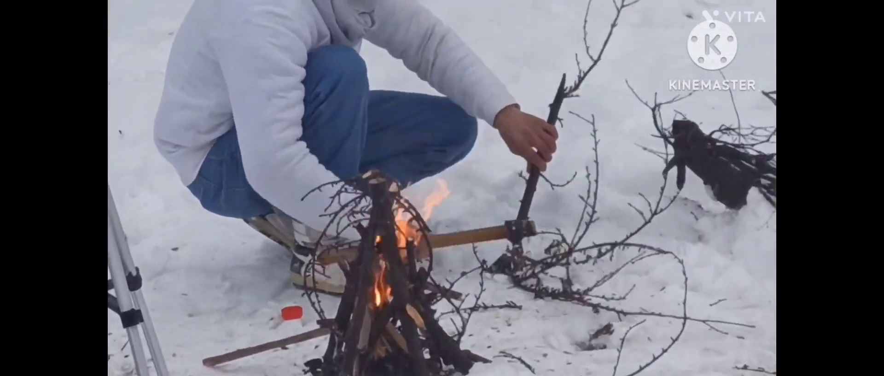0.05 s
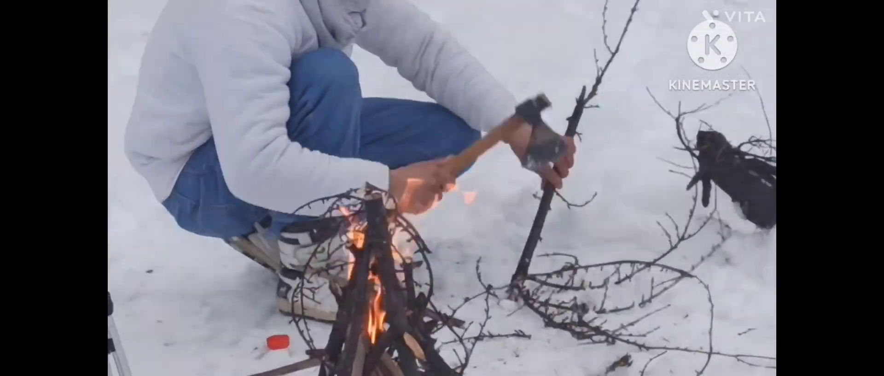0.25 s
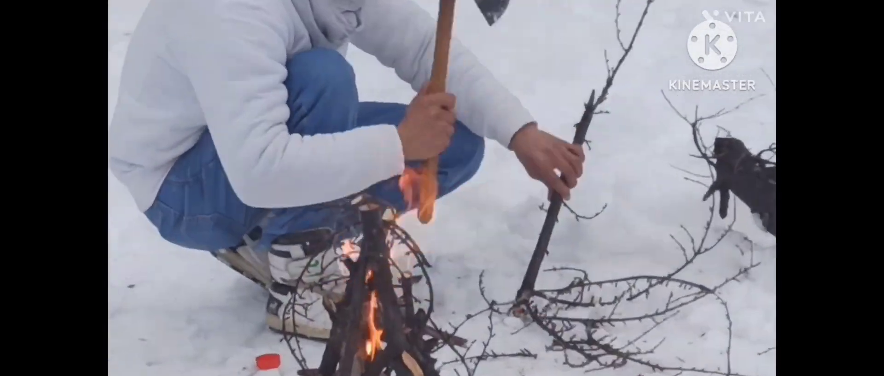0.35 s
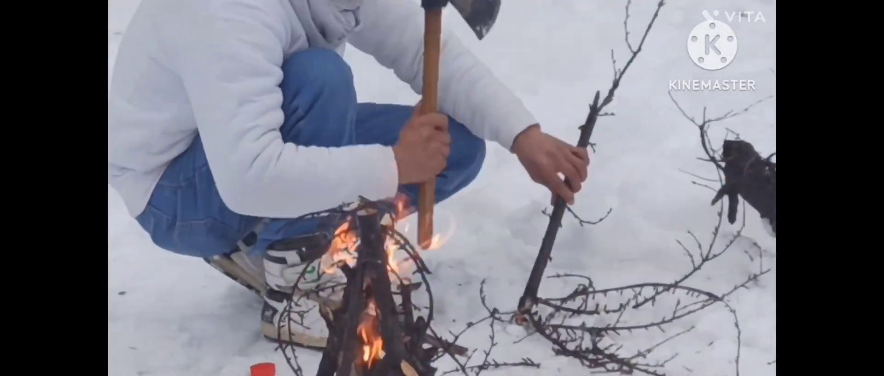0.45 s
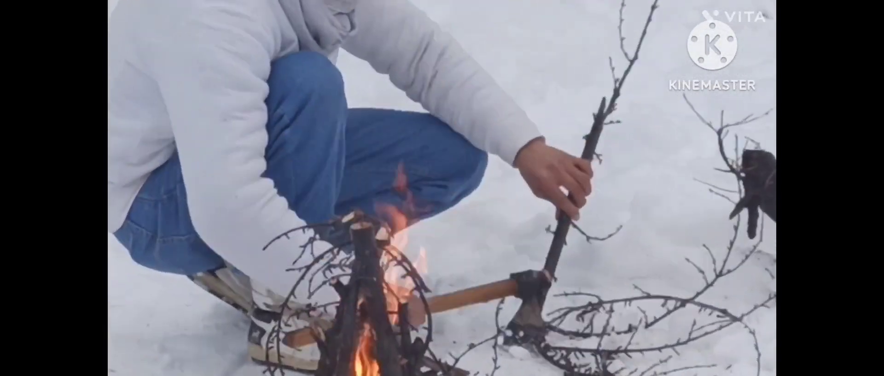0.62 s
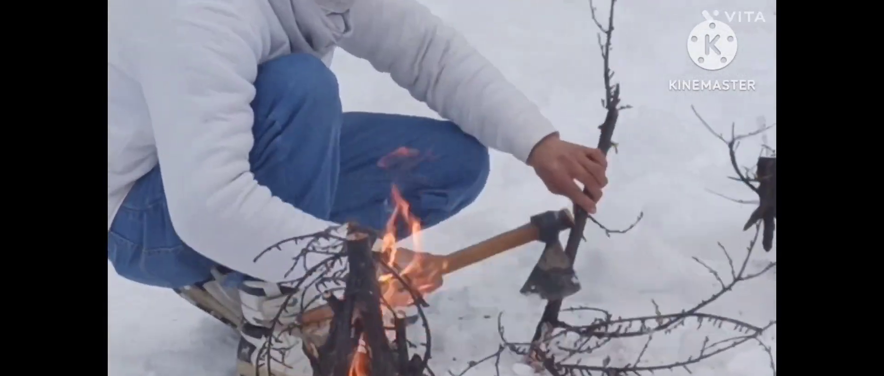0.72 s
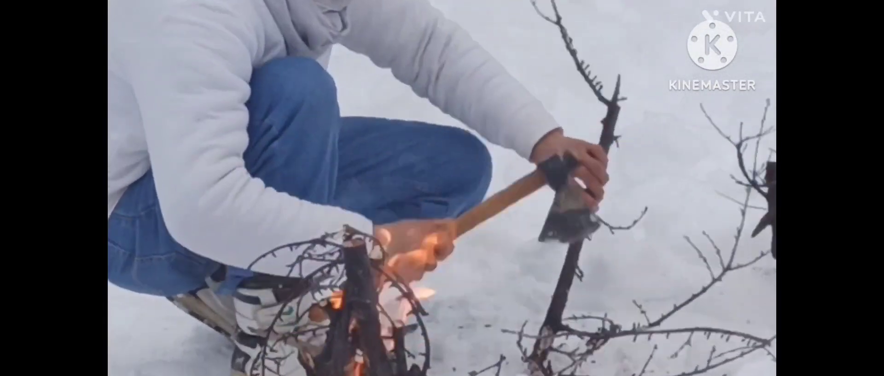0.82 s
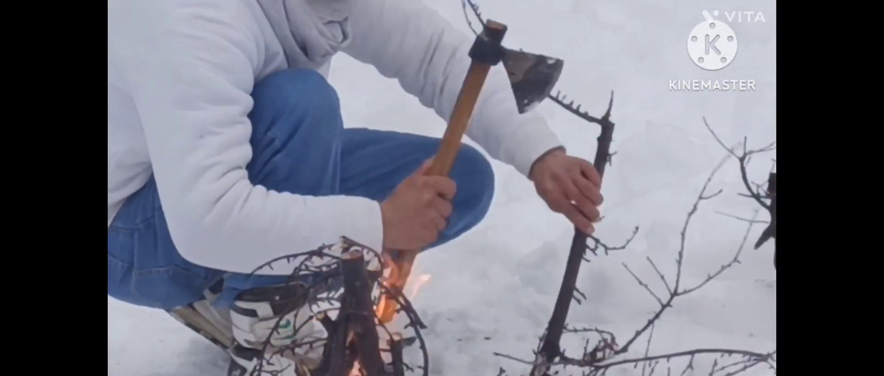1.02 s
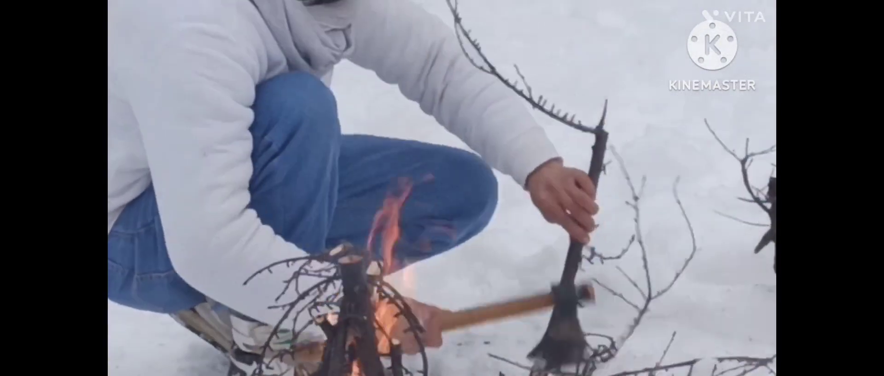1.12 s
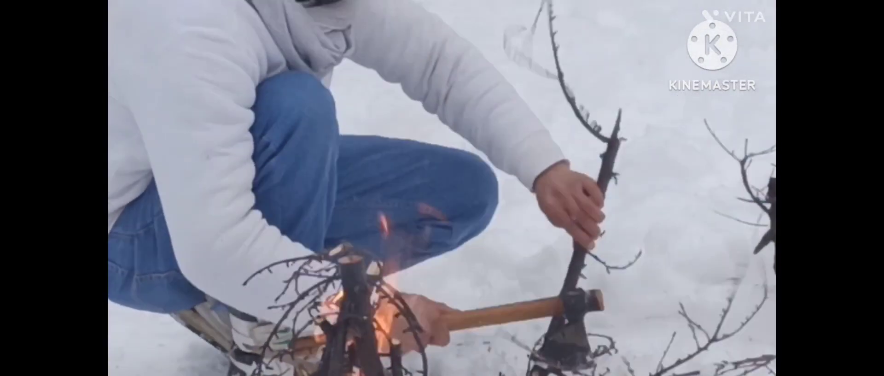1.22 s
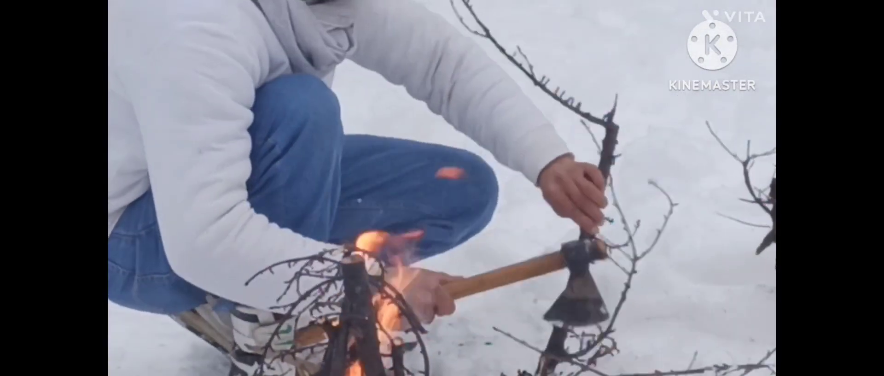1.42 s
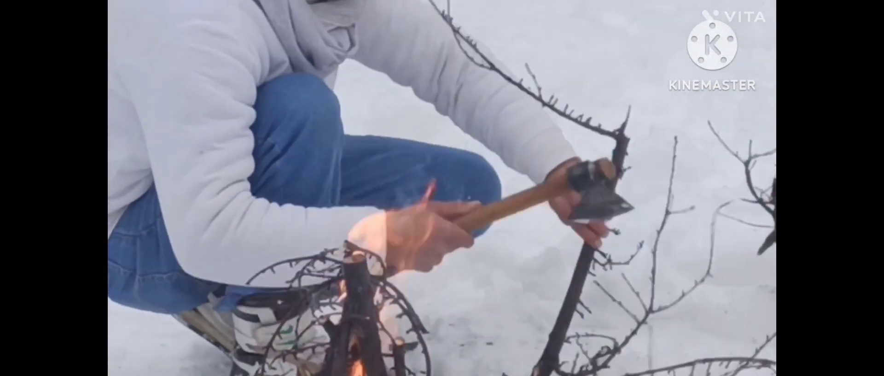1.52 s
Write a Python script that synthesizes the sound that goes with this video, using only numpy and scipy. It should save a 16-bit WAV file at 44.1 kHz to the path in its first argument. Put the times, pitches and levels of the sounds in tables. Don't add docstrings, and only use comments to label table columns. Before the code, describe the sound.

A small hatchet chops a thin branch three times beside a softly hissing outdoor fire

```python
import sys
import numpy as np
from scipy import signal
from scipy.fft import rfft, irfft, next_fast_len
from scipy.io import wavfile
from scipy.ndimage import uniform_filter1d, map_coordinates

SR = 44100
rng = np.random.default_rng(int(sys.argv[2]) if len(sys.argv) > 2 else 0)


def bounce(signal):
    frames = np.transpose(np.atleast_2d(signal))
    limited = np.clip(frames, -1, 1)
    pcm = np.round(limited * 32767).astype(np.int16)
    wavfile.write(sys.argv[1], SR, pcm)


def rack_gain(trim_db):
    fader = np.asarray(trim_db, float)
    return 10 ** (fader / 20)


N = 68355


def unit(x):
    return x / np.sqrt(np.mean(x ** 2) + 1e-20)


def along(points, hz):
    point_hz, value = np.transpose(points)
    return np.interp(np.log(hz + 1), np.log(point_hz + 1), value)


def wobble(rate_hz):
    knots = rng.standard_normal(int(N * rate_hz / SR) + 4)
    return map_coordinates(knots, [np.arange(N) * rate_hz / SR])


def filtered(x, response):
    size = 2 * next_fast_len(len(x) // 2 + 4096)
    spectrum = rfft(x, size) * response(np.fft.rfftfreq(size, 1 / SR))
    return irfft(spectrum, size)[:len(x)]


def add(out, start_s, x):
    part = out[round(start_s * SR):][:len(x)]
    part += x[:len(part)]


def ring(modes, attack_s, scatter_db):
    t = np.arange(SR // 5) / SR
    out = np.zeros(len(t))
    for pitch_hz, level_db, t60_s in modes:
        hit_db = level_db + scatter_db * rng.standard_normal()
        out += rack_gain(hit_db - 60 * t / t60_s) * np.sin(2 * np.pi * pitch_hz * t)
    return out * (1 - np.exp(-t / attack_s))


def burst(colour, t60_s):
    t = np.arange(SR // 5) / SR
    noise = filtered(rng.standard_normal(len(t)), lambda hz: rack_gain(along(colour, hz)))
    return unit(noise) * rack_gain(-60 * t / t60_s)


# start_s, crack_db, edge_db, head_db, free (share of the free ring time)
BLADE_CONTACTS = [(0.2051, -43.5, -35, -40, 0.46), (0.2077, -44, -56, -53, 0.44),
                  (0.21, -39, -48, -48, 0.44), (.2129, -26, -2, -40, 0.28), (0.215, -35, -33, -33, 0.21),
                  (.828, -39, -28, -50, 1.3), (0.8311, -43, -40, -46.5, 0.82),
                  (.835, -43.5, -44, -34, 1.02), (0.8386, -31, -13, -33.5, 0.94),
                  (.843, -41.5, -40, -59, 1.05), (1.404, -50, -52, -69, 0.25), (1.4065, -50, -58, -63, .3)]
# pitch_hz, level_db, t60_s
HEAD_MODES = [(2461, 1, 0.041), (4706, -3, 0.054), (4708, -27, .1), (7650, -19, .05), (3300, -16.5, 0.011),
              (5410, -7, 0.013), (13800, 1, 0.011)]
# pitch_hz, level_db, t60_s
EDGE_MODES = [(6530, 3.5, .004), (7290, -5, .005), (12900, -18, 0.0082), (6540, -29, 0.019)]
# freq_hz, level_db
CRACK_COLOUR = [(300, -7), (1000, 7.5), (3000, -4), (6000, 1), (16000, -3.5)]
CRACK_T60_S, SPLINTER_T60_S, SPLINTER_DB = 0.013, 0.046, -18.5


def hatchet():
    out = np.zeros(N)
    for start_s, crack_db, edge_db, head_db, free in BLADE_CONTACTS:
        crack = burst(CRACK_COLOUR, CRACK_T60_S)
        crack += rack_gain(SPLINTER_DB) * burst(CRACK_COLOUR, SPLINTER_T60_S)
        damped_modes = [(hz, db, t60_s * free) for hz, db, t60_s in HEAD_MODES]
        head = ring(damped_modes, attack_s=0.00093, scatter_db=1.4)
        edge = ring(EDGE_MODES, attack_s=0.0022, scatter_db=0.73)
        add(out, start_s, rack_gain(crack_db) * crack + rack_gain(edge_db) * edge + rack_gain(head_db) * head)
    return out


# start_s, knock_db, pitch_hz (of the knock), thump_db
WOOD_CONTACTS = [
    (0.2066, -42.5, 715, -32.5),
    (0.2109, -39, 910, -44),
    (0.2148, -36, 639, -21),
    (.8284, -39, 742, -68),
    (.8388, -33.5, 611, -52),
    (0.8405, -38, 528, -22),
    (1.4039, -40.5, 622.6, -58),
    (1.408, -49, 607, -35.5),
]
# pitch_ratio, level_db, t60_s
KNOCK_MODES = [(0.983, 3, 0.025), (0.672, -5.5, 0.022), (1.45, -14, 0.0165), (2.42, -11.5, 0.02),
               (3.12, -10.5, 0.017), (4, -9, 0.019)]
# pitch_hz, level_db, t60_s
THUMP_MODES = [(198.3, 0.5, 0.049), (138.3, -22, 0.18), (105, -21, 0.073)]


def branch():
    out = np.zeros(N)
    for start_s, knock_db, pitch_hz, thump_db in WOOD_CONTACTS:
        modes = [(pitch_hz * ratio, db, t60_s) for ratio, db, t60_s in KNOCK_MODES]
        knock = ring(modes, attack_s=0.00027, scatter_db=1.5)
        thump = ring(THUMP_MODES, attack_s=0.0004, scatter_db=0.21)
        add(out, start_s, rack_gain(thump_db) * thump - rack_gain(knock_db) * knock)
    return out


# centre_s, length_s, pitch_hz, width_hz, level_db
WHIRRS = [
    (0.23, 0.022, 3600, 600, -66),
    (0.257, 0.043, 4600, 1100, -70),
    (0.331, 0.13, 6850, 950, -72.5),
    (.344, .017, 3580, 350, -57.5),
    (0.364, 0.036, 4640, 603, -71),
    (0.372, 0.063, 3730, 700, -73),
    (0.32, 0.26, 3940, 2000, -73),
    (0.924, 0.055, 1500, 1800, -70.5),
]
WHIRR_GRAIN_DB = 3


def chips():
    out, t = np.zeros(N), np.arange(N) / SR
    for centre_s, length_s, pitch_hz, width_hz, level_db in WHIRRS:
        band = filtered(rng.standard_normal(N), lambda hz: np.exp(-((hz - pitch_hz) / width_hz) ** 2 * 2))
        grainy = unit(band * rack_gain(WHIRR_GRAIN_DB * wobble(159.9)))
        swell = np.exp(-2 * ((t - centre_s) / length_s * 2) ** 2)
        out += rack_gain(level_db) * grainy * swell
    return out


# start_s, level_db, t60_s
TICK_EVENTS = [
    (.262, -67, 0.029),
    (.2872, -60.5, 0.028),
    (0.914, -60, 0.011),
    (1.2311, -62, 0.016),
    (1.268, -59, 0.017),
    (1.2733, -61, 0.038),
    (1.3858, -58, 0.031),
    (1.428, -63, .015),
    (1.445, -69.5, 0.019),
    (1.4918, -59.5, 0.027),
]
# freq_hz, level_db
TICK_COLOUR = [(300, -2), (900, 11.5), (3000, -11), (7000, 5.5), (16000, -5)]


def ticks():
    out = np.zeros(N)
    for start_s, level_db, t60_s in TICK_EVENTS:
        add(out, start_s, rack_gain(level_db) * burst(TICK_COLOUR, t60_s))
    return out


# freq_hz, density_db (per Hz)
AIR_COLOUR = [(30, -36), (60, -23), (90, -5), (200, -9.5), (430, -13.5), (1200, -22.5), (3000, -29.5),
              (16000, -30)]
# time_s, level_db
HISS_LEVEL = [(0.0, -67.5), (0.332, -66.5), (0.816, -67), (1.01, -65), (1.398, -67), (1.55, -66.5)]
# from_hz, level_db
TREBLE_SHELVES = [(0, -2.5), (4750, -9.5), (6050, 1), (7700, -11), (8600, -22), (11500, -11.5), (13000, -7),
                  (15600, -50)]


def fire_hiss():
    cells = signal.stft(rng.standard_normal(N), nperseg=512)[2]
    patches = uniform_filter1d(rng.standard_normal(cells.shape), size=8, axis=0)
    patches = unit(uniform_filter1d(patches, size=8, axis=1))
    hiss = signal.istft(cells * rack_gain(1.04 * patches), nperseg=512)[1][:N]
    from_hz, shelf_db = np.transpose(TREBLE_SHELVES)

    def colour(hz):
        shelf = np.searchsorted(from_hz, hz, "right") - 1
        return rack_gain(along(AIR_COLOUR, hz) + shelf_db[shelf])

    level_db = np.interp(np.arange(N) / SR, *np.transpose(HISS_LEVEL)) + 2.0
    return rack_gain(level_db + 0.72 * wobble(14.1)) * unit(filtered(hiss, colour))


# pitch_hz, level_db (rms), shake_db (unsteadiness), drift (share of pitch)
HUM_TONES = [(57.3, -75.5, .4, 0.0015), (117, -68, 2.5, 0.041), (203, -77, 2.5, 0.045),
             (240, -80, 2.5, 0.0407)]


def engine_hum():
    out = np.zeros(N)
    for pitch_hz, level_db, shake_db, drift in HUM_TONES:
        level = np.sqrt(2) * rack_gain(level_db + shake_db * wobble(18))
        phase = 2 * np.pi * np.cumsum(pitch_hz * (1 + drift * wobble(16))) / SR
        out += level * np.sin(phase)
    return out


# freq_hz, level_db
MIC_RESPONSE = [(20, -45), (70, -11), (150, -2), (7600, 4), (9000, -14.5), (11000, -21.5), (12200, -4),
                (15300, -13)]


def microphone(x):
    def response(hz):
        cepstrum = irfft(np.log(rack_gain(along(MIC_RESPONSE, hz))))
        half = len(cepstrum) // 2
        fold = np.r_[1, 2 * np.ones(half - 1), np.zeros(len(cepstrum) - half)]
        return np.exp(rfft(cepstrum * fold))
    return filtered(x, response)


def scene():
    near = hatchet() + branch() + chips() + ticks()
    return (microphone(near) + fire_hiss() + engine_hum())[None]


def top_cut(x):
    return signal.sosfilt(signal.butter(12, 16400, fs=SR, output="sos"), x)


def record(dry):
    top_hz = 15700
    mix = filtered(dry[0], lambda hz: 1 / (1 + (hz / top_hz) ** 80))[None]
    return top_cut(mix)


dry = scene()
out = record(dry)
bounce(out)
```